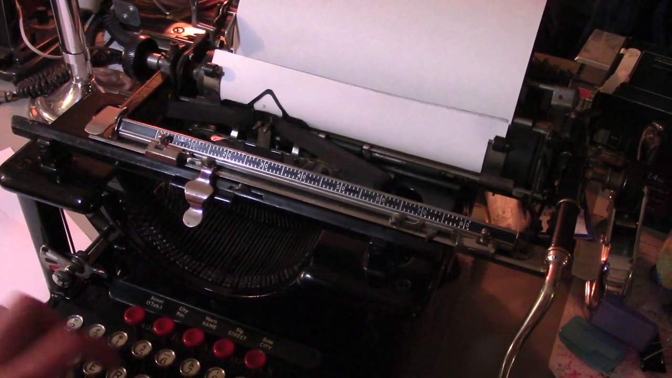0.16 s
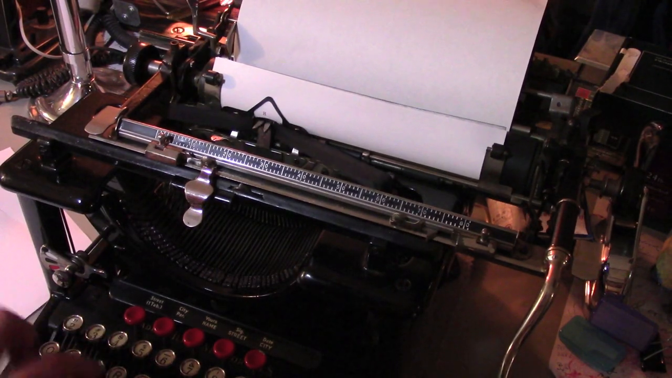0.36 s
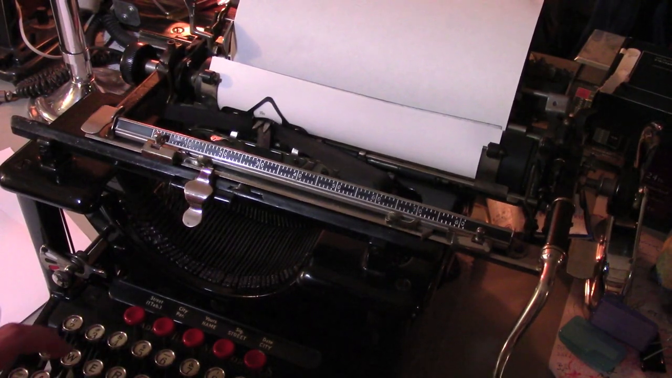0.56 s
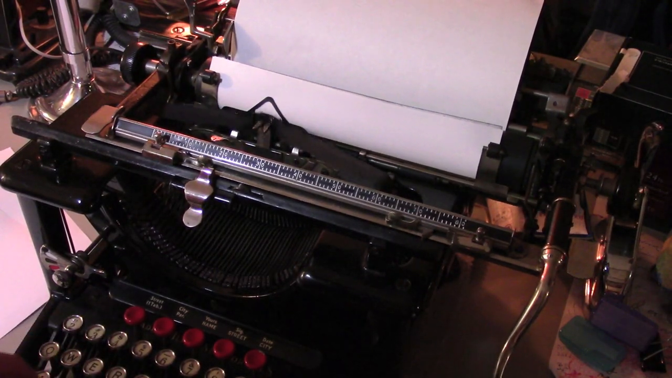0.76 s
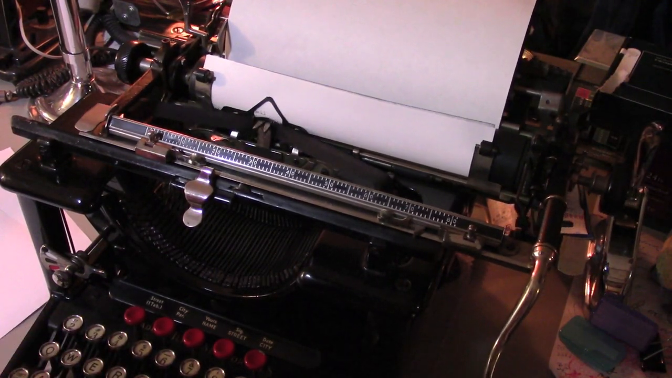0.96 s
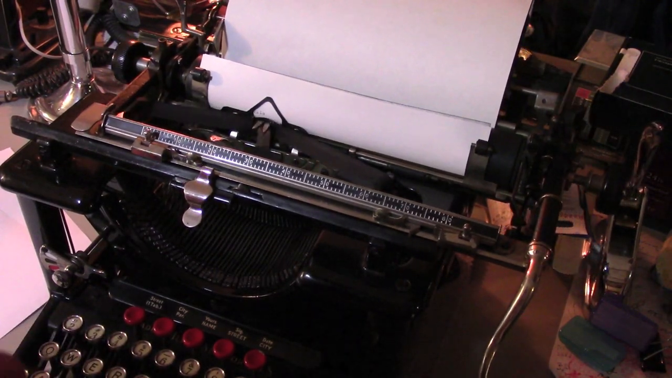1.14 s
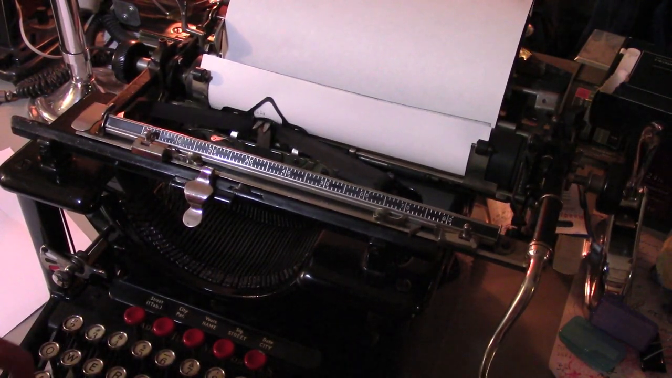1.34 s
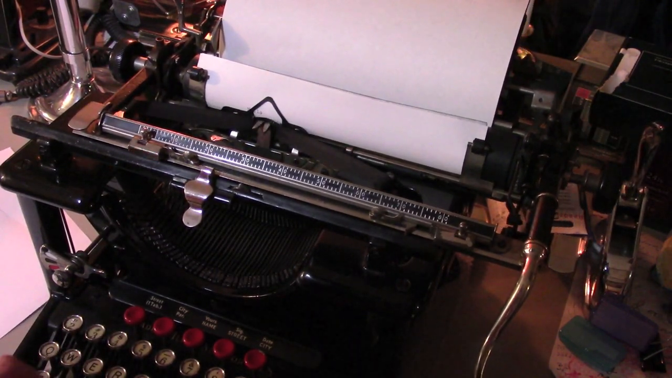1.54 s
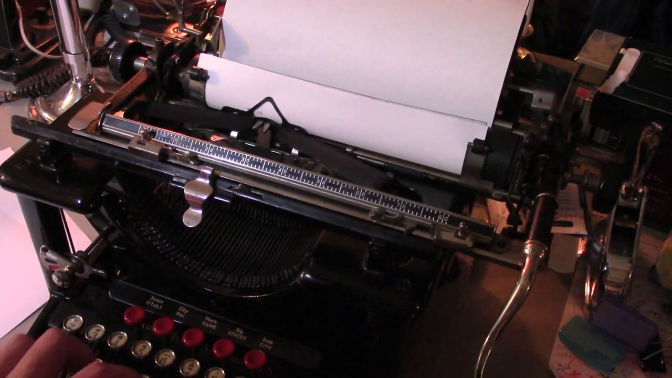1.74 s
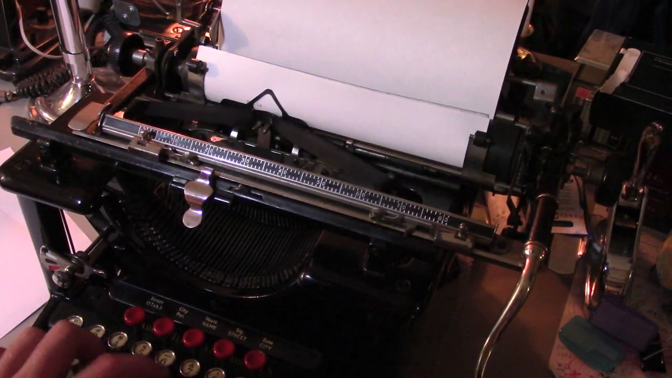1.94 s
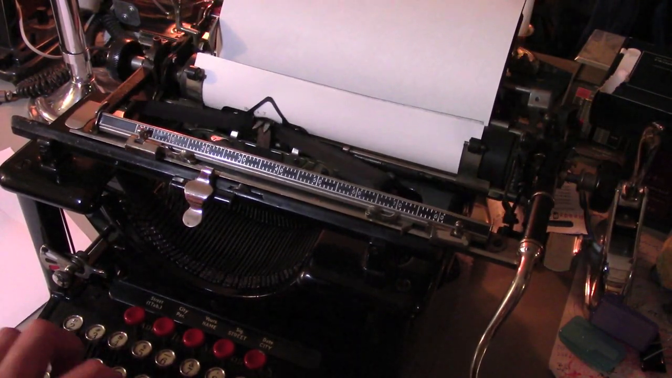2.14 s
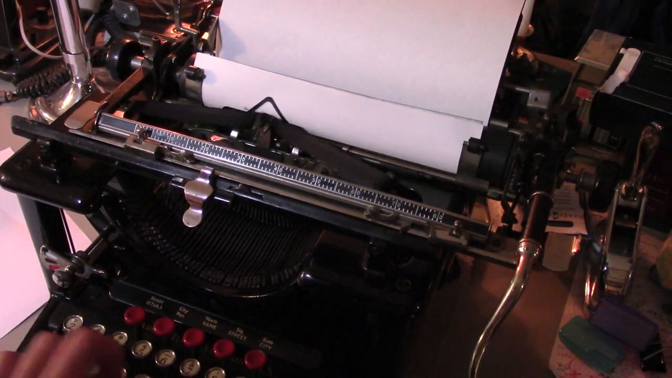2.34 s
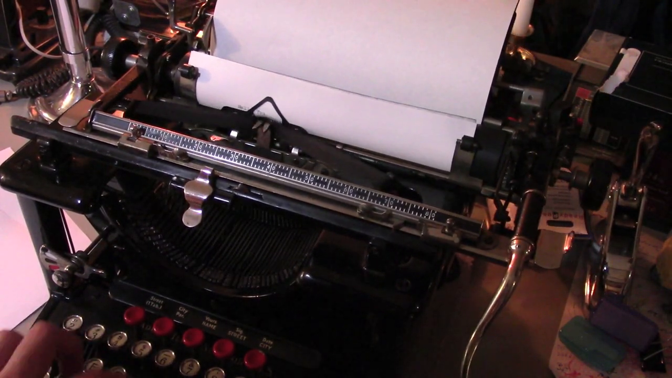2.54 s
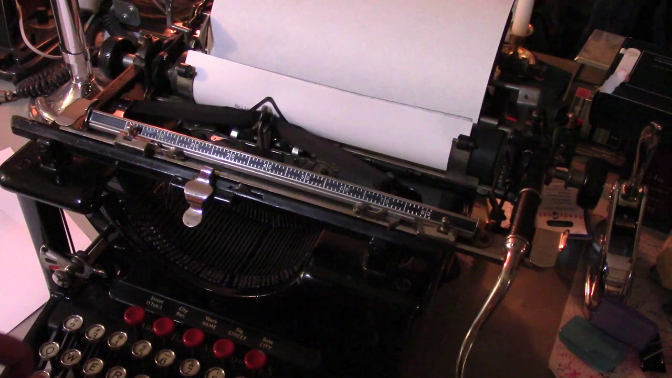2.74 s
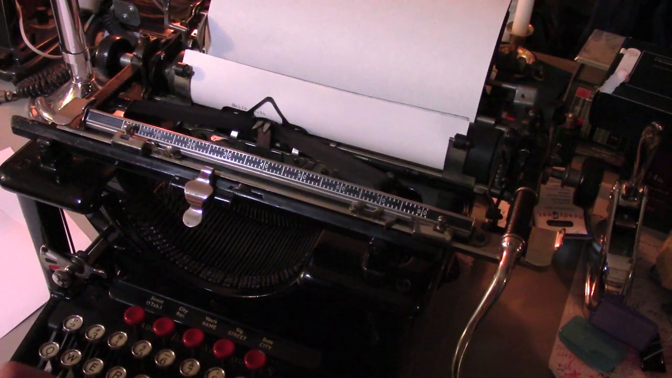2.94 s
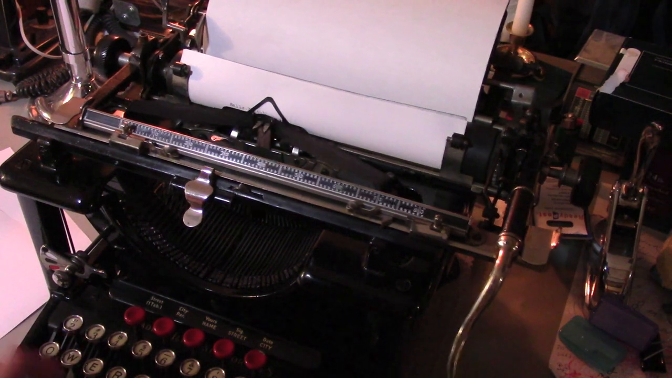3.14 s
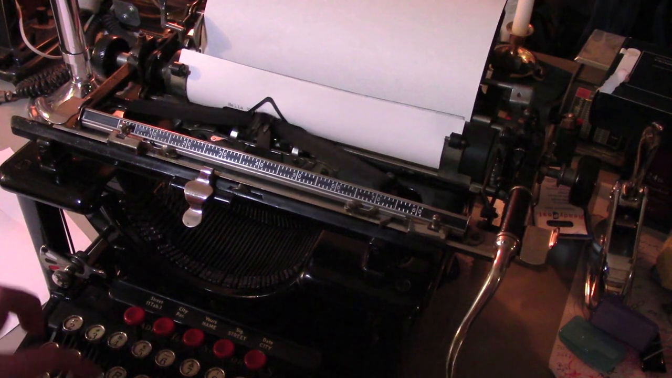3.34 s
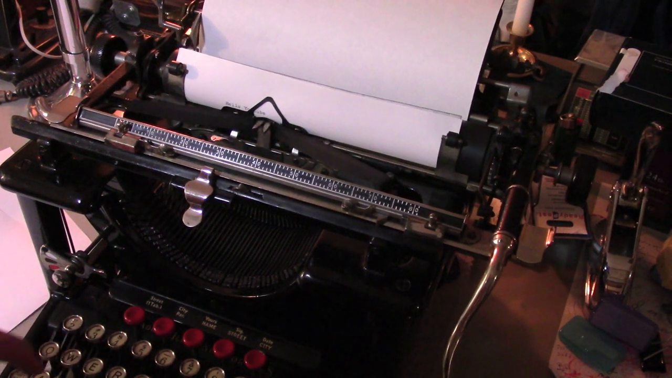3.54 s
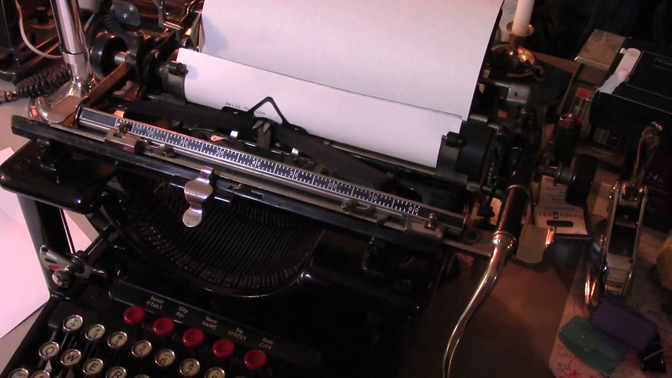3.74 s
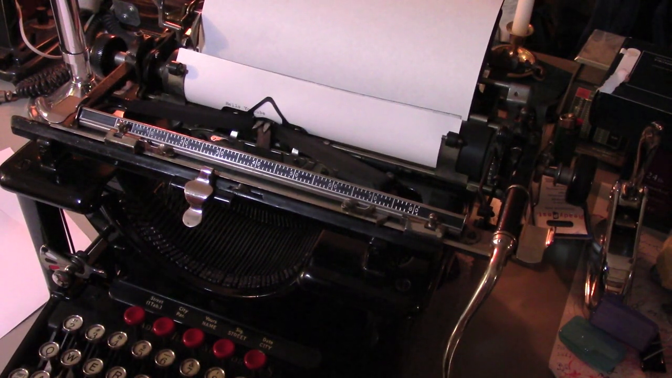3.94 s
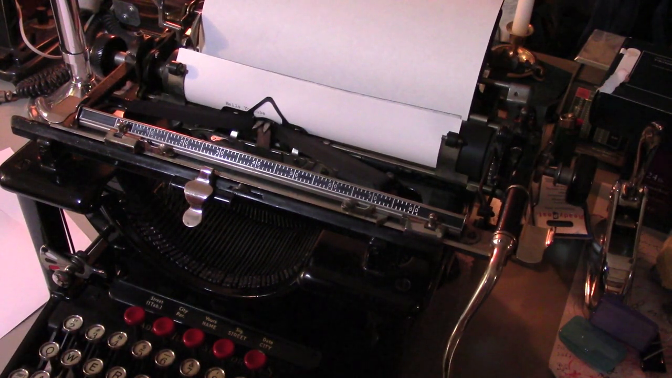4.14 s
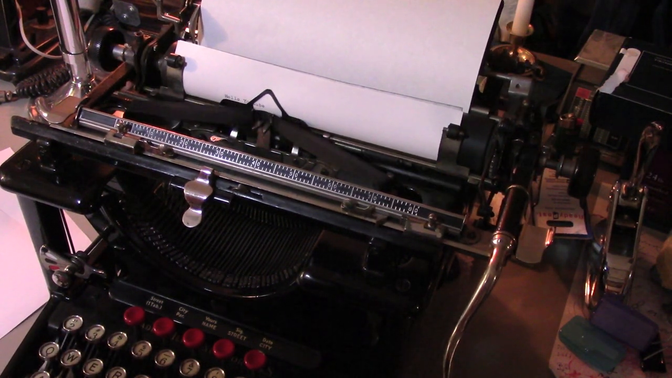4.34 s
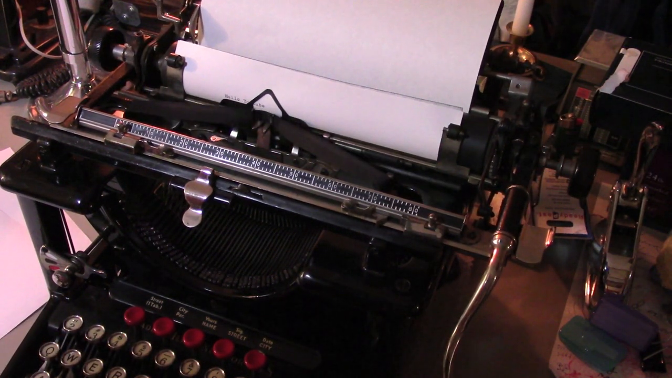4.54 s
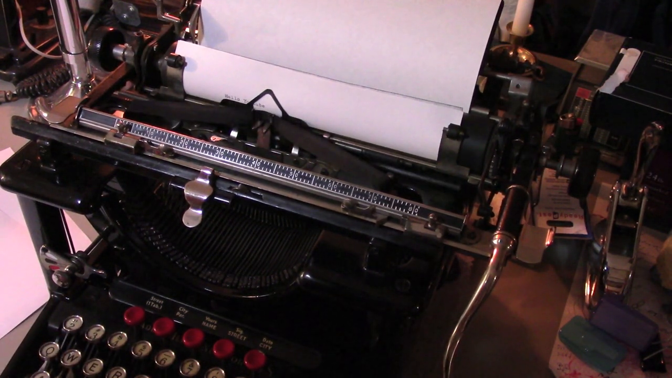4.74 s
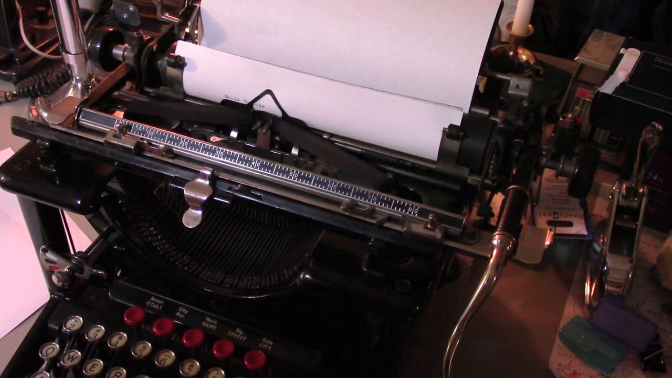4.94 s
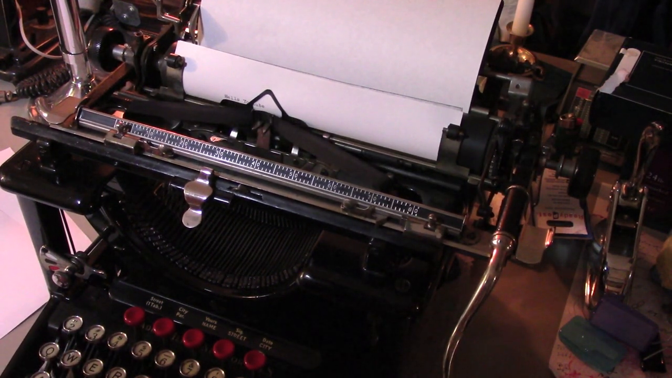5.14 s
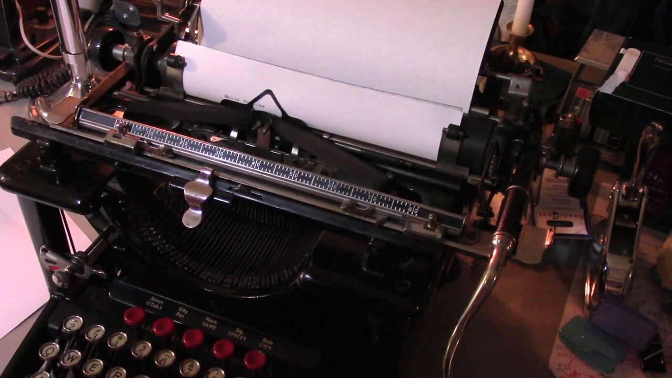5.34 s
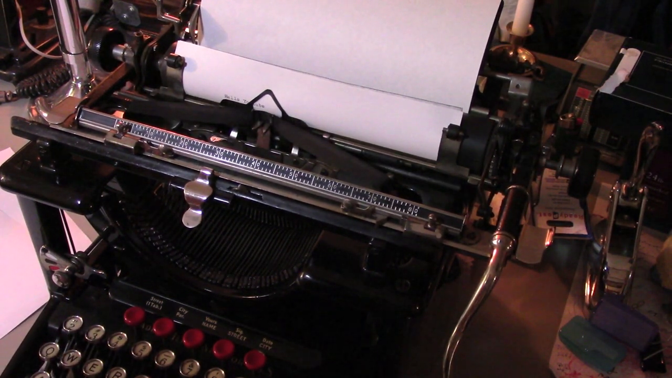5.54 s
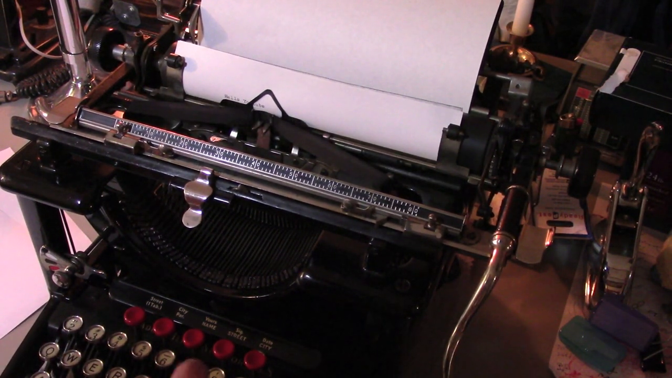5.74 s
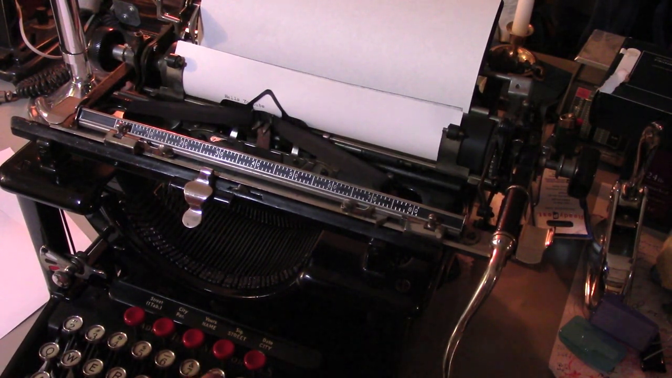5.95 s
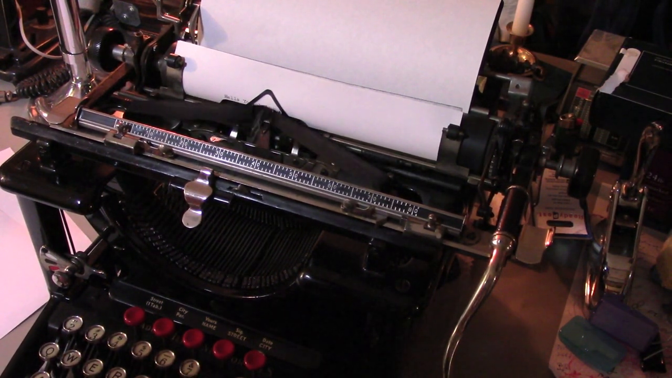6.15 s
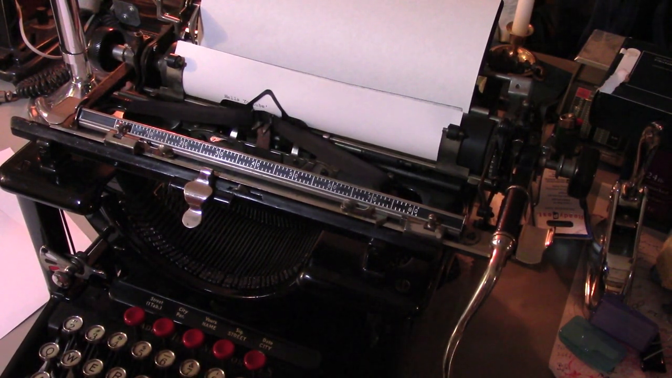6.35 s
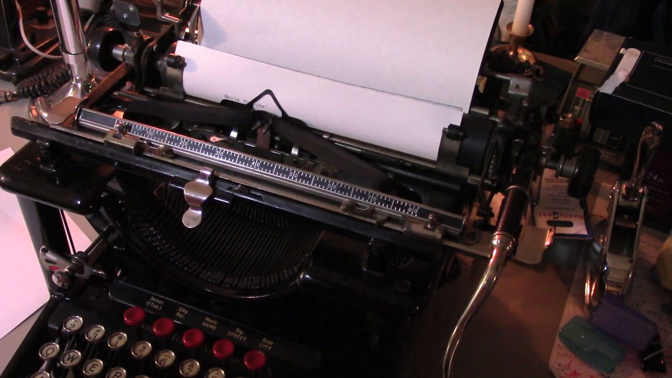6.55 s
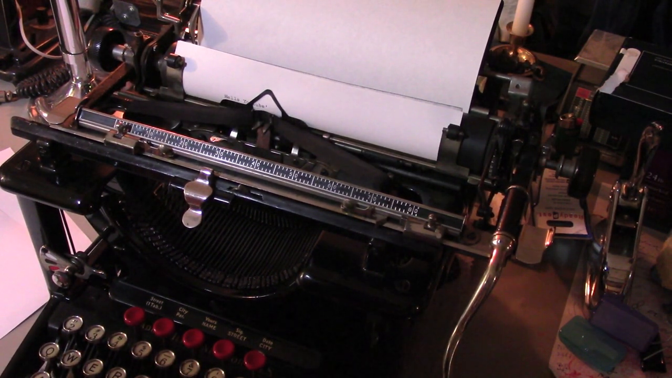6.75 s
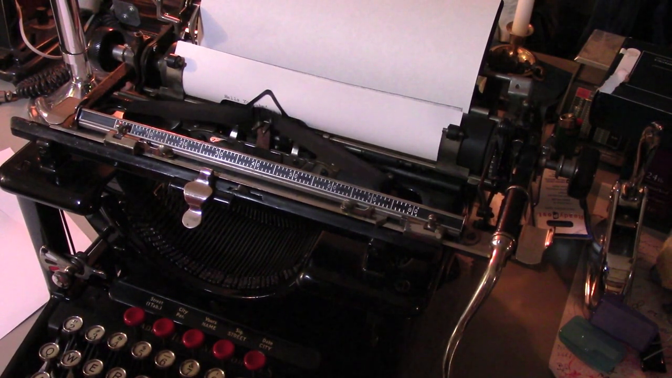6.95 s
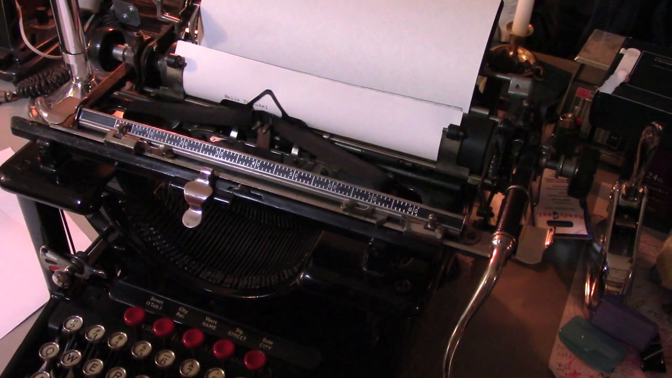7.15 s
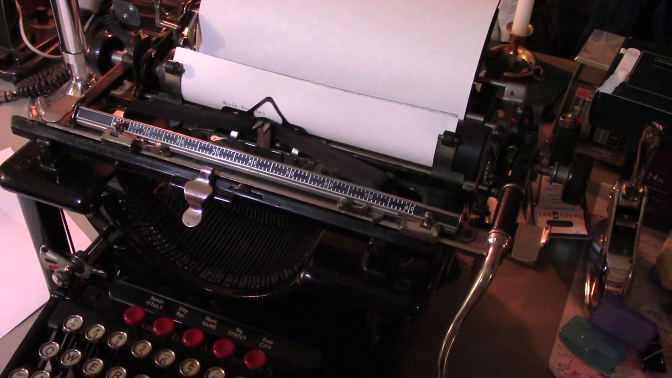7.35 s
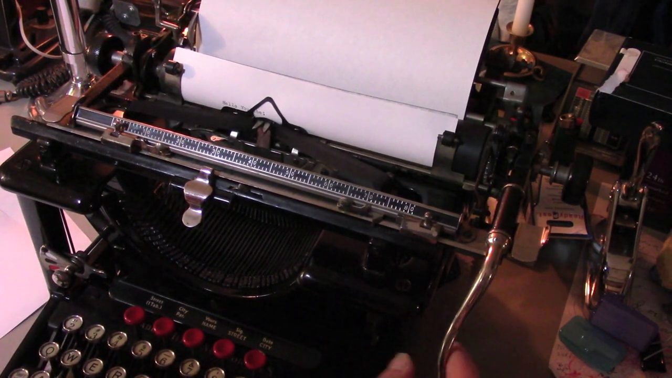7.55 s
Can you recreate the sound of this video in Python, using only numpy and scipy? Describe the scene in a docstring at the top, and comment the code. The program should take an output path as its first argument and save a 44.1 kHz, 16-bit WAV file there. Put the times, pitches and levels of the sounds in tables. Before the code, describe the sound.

A heavy old manual typewriter is heard very close, in mono, in a quiet room with faint low rumble and soft hiss. Typing starts at once: sharp metallic slaps at 0.05, 0.4, 0.8, 0.9 and 1.05 seconds, each preceded by a small linkage click and followed by a rattling key return and loose clinks. Duller space bar or carriage thumps fall at 0.25, 1.35, 1.9 and 2.15. A faster run of strikes goes from 2.0 to 2.75, then two more at 3.1 and 3.3. The machine then rests. A solid thump comes at 4.25 with a short steel ring, a weak clunk at 4.85, then only tiny ticks. A barely perceptible thin squeak hovers around 6 to 6.5. Single strikes land at 6.1 and 7.0, each falling back with a clatter, and a final weighty thump at 7.25 dies into quiet.

```python
"""Manual typewriter on a desk

An old manual typewriter is heard close by in a quiet room: linkage, escapement, type slap, then rattling returns.
Contacts are shaped noise bands with fast decay over a longer ring; thin steel and carriage are decaying sines.
Space bar and carriage thumps are heavier. Modal resonance carries contact noise into the frame and desk.
Beating springs, loose clinks, soft knocks and a faint gliding squeak sound over filtered room noise.
"""
import sys
import numpy as np
from scipy import signal
from scipy.fft import rfft, irfft, next_fast_len
from scipy.io import wavfile
from scipy.ndimage import uniform_filter1d

SR = 44100
rng = np.random.default_rng(int(sys.argv[2]) if len(sys.argv) > 2 else 0)


def to_wav(s):
    """Save 16-bit WAV."""
    ch = np.atleast_2d(s).T  # columns
    pcm = np.round(np.clip(ch, -1, 1) * 32767)  # PCM
    wavfile.write(sys.argv[1], SR, pcm.astype(np.int16))


N = 334719

# All event levels are relative: layer gains and resonances act on them later.
# Room noise density: frequency_hz, density_db (relative, per Hz)
ROOM_SPECTRUM = [(15, -19), (26, 1.5), (45, -7), (65, -11.5), (95, -12.5), (122, -12.5), (160, -15.5),
                 (260, -12), (420, -15.5), (520, -20), (720, -25.5), (1200, -27.5), (1750, -35.5),
                 (5000, -43), (15500, -48.5)]
# Decay of a blow in machine and room: frequency_hz, t60_s
HOLD_TIMES = [(60, 0.86), (130, 0.27), (350, .25), (900, 0.18), (2400, 0.17), (6000, 0.16), (14000, 0.18)]
# Letters, timed by the type hitting the platen: start_s, level_db, body_db, brightness_db,
# key_travel_s, key_db, escapement_db, key_held_s, fall_back_db
LETTERS = [(0.049, -17, 1, 5, .042, -34.5, -24, 0.075, -25.5),
           (0.4205, -16.5, 1, 0, 0.04, -30, -28, 0.07, -27.5),
           (0.784, -19, 6, -1, 0.045, -35.5, -25, 0.038, -30.5),
           (0.889, -17, 3.5, -0.5, 0.052, -33, -28, 0.045, -27),
           (1.0489, -16, 0.5, 1, .041, -38.5, -23, 0.067, -26.5),
           (2.0355, -16, -0.5, 2, .0395, -31, -23, 0.083, -30),
           (2.319, -18, 4.5, -1, 0.045, -33.5, -25, 0.069, -27),
           (2.4175, -17.5, 2.5, -2.5, 0.04, -30, -25, 0.049, -27.5),
           (2.5832, -16.5, 0, -3, 0.04, -31, -26.5, 0.07, -25.5),
           (2.7465, -16, 0.5, -2, .039, -32.5, -27, 0.062, -27),
           (3.098, -16, -0.5, -2, 0.039, -31.5, -24.5, 0.068, -25.5),
           (3.3144, -15, -4, -2.5, 0.036, -29.5, -26, 0.07, -26.5),
           (6.1179, -18, -1, 1, .0545, -39, -27, 0.071, -26.5),
           (6.9757, -16.5, -1, -1, 0.042, -40.5, -24, 0.076, -30)]
# Contact spectra, in order of first use: frequency_hz, density_db (relative, per Hz)
KEY_COLOUR = [(40, 0), (110, 9.5), (200, -0.5), (400, -2), (650, 4.5), (850, -2), (1200, -0.5),
              (1550, -10.5), (2200, 0), (3000, 4), (3900, -1), (4800, -1), (7000, -9.5), (15000, -19)]
ESCAPEMENT_COLOUR = [(40, -15.5), (200, -9.5), (450, -3), (800, 1.5), (1200, -8.5), (1600, -10.5),
                     (2200, 2), (3100, 2.5), (4100, -9.5), (6500, -8), (10000, -11), (15000, -16.5)]
STRIKE_COLOUR = [(40, -19), (110, -7), (200, -13.5), (310, -13), (430, 2), (620, -10), (1100, -3.5),
                 (1650, -6.5), (2600, -1.5), (3700, -1), (6500, -5), (9500, -10.5), (15000, -22)]
SNAP_COLOUR = [(100, -34), (1200, -19), (2200, -5), (3600, 4.5), (5200, -2), (7500, -13.5), (15000, -30)]
RETURN_COLOUR = [(40, 2.5), (130, 9), (260, -3), (480, 7.5), (700, -1.5), (1150, 4), (1550, -4.5),
                 (2900, -2), (4800, -4.5), (7000, -11.5), (11000, -17), (15000, -22)]
TICK_COLOUR = [(100, -3.5), (1000, 1.5), (3000, 1.5), (4200, 0.5), (6000, -2), (9000, -7.5), (15000, -14)]
THUMP_COLOUR = [(40, -2), (105, 7), (190, 5.5), (350, 3), (520, 6), (720, 2.5), (1150, -0.5), (1650, -7.5),
                (2500, -3.5), (4800, -8), (7000, -9), (10000, -16), (15000, -27)]
SOFT_COLOUR = [(50, 5.5), (150, 4.5), (300, 8.5), (850, -1), (1500, -19), (2400, -18), (5000, -35),
               (15000, -54)]
# Modes of frame, typebars and desk: frequency_hz, lift_db, t60_s
FRAME_MODES = [(72, 1, .7), (96, 0, .7), (121, 0, .5), (228, -5, .25), (425, -4, .2), (494, 0, .2),
               (946, -7, .12), (1132, -7, .08), (1311, -4, .13), (2092, -3, .08), (2240, -5, .09),
               (2837, 1, .09), (3060, -5, .06), (3290, -5, .06), (3832, -3, .06), (5190, -1, .07),
               (5598, -3, .09), (5917, -1, .13), (6892, -5, .08), (7854, -4, .08)]
# Small steel parts left singing: start_s, pitch_hz, level_db, t60_s
PINGS = [(.972, 7320, -25, 0.043), (1.159, 12100, -39, 0.23), (4.266, 2140, -31, 0.15),
         (4.867, 5700, -34, .05), (4.863, 4000, -33.5, .064), (6.241, 9380, -25, 0.074),
         (4.4, 5570, -51, 0.062), (6.241, 5030, -35, 0.1)]
# Contacts of a fall-back: delay (multiple of key_held_s), level_db, body_db, brightness_db
KEY_RELEASE = (1, -5, 0, -6)
CARRIAGE_STEP = (1.27, -4.5, 1, -4)
BAR_LANDING = (1.61, -.5, .5, 3)
# Additions for a lone letter, which has no separate carriage step: level_db, body_db, brightness_db
LONE_RELEASE = (-1.9, -6.5, 2)
LONE_LANDING = (.5, -2.5, 2.1)
# Space bar springing back: pressed_s, held_s, level_db
SPACE_RETURNS = [(1.358, 0.061, -28.5)]
# Linkage slack taken up just ahead of a slow thump: start_s, level_db, body_db, brightness_db
TAKE_UPS = [(4.839, -29.5, -3.5, 1), (7.252, -37.5, 10.5, 0)]
# Further light ticks, among them a typebar's bounce: start_s, level_db
TICKS = [(.601, -46.5), (1.342, -47), (2.249, -39.5), (2.95, -51), (4.403, -60.5), (4.81, -57),
         (5.287, -56), (5.43, -61), (5.564, -51), (7.241, -44), (7.36, -50.5)]
# Space bar and carriage thumps: start_s, level_db, desk_db, frame_db, knock_db, brightness_db,
# squarely_hit_mode_hz, squarely_hit_lift_db, tooth_db
THUMPS = [(.234, -19.5, -1, -6.5, -3.5, -1, 1340, 7.5, -40), (1.3556, -26, -4, 3.5, -3.5, 1, 321, 19, -17),
          (1.921, -20, -2, -3, -3.5, -4.5, 1160, 10.5, -20.5),
          (2.1471, -19.5, -0.5, -10, -9, -4, 1085, 12.5, -23.5),
          (2.163, -28.5, -5, 0, 4, 3.5, 480, 8.5, -27), (4.2663, -23, -2, -2, -1.5, -4.5, 1107, 11, -20.5),
          (4.8452, -34, -2.5, 3.5, -1.5, 7, 363, 15.5, -25.5),
          (7.264, -19.5, -1, -2, -1, -2.5, 2850, 9, -20.5)]
# Carriage on its rails, knocked as a whole: frequency_hz, level_db, t60_s
CARRIAGE_MODES = [(88, -8, .13), (128, -5, .11), (225, -11, .11), (292, -10, .1), (362, -13, .1),
                  (492, -2.5, .13), (530, -8, .09), (955, -9, .07), (1085, -5, .045), (1165, -5, .05),
                  (1314, -8, .11), (2850, -9, .05), (4830, -8, .06)]
# Soft knocks of the desk: start_s, level_db
SOFT_KNOCKS = [(1.49, -41), (4.223, -44.5), (4.246, -59), (7.425, -45)]
# Broken high squeak: time_s, pitch_hz, level_db
SQUEAK_PATH = [(5.8, 9500, -90), (5.92, 12000, -79), (6.1, 14000, -83), (6.32, 12100, -75),
               (6.38, 10700, -76), (6.43, 10320, -77), (6.5, 8800, -90)]

BANDS_HZ = 40 * 2 ** (np.arange(27) / 3)  # third-octave centres
LENGTH = int(.32 * SR)  # samples in one blow
ATTACK = int(.012 * SR)  # samples that set the scale of a blow's energy
ROOM_DB, TOP_HZ = -50, 16000
KEY_BODY_DB, KEY_BRIGHT_DB = 0, 3
TRIP_SHARE, TRIP_DB = .2, 2.5  # share of key travel left at the trip; layer gain
RUN_GAP_S = .5  # closer letters belong to a quick run
SPRING_HZ, SPRING_BEAT_HZ, SPRING_DB, SPRING_T60_S = 8400, 9, -64, 1.2
CLINK_COUNT, CLINK_SCATTER_DB, CLINK_FADE_DB = 3, 5, -9  # latest clinks get the full fade
GLIDE_LAG_S, GLIDE_DB = .088, -36.5
BOUNCE_S, BOUNCE_DB = .051, -20.5
TOOTH_LAG_S = .0032


def undb(db):
    """Logarithmic level: convert decibels to amplitude gain."""
    return 10 ** (np.asarray(db) / 20)


def at_hz(points, hz):
    """Logarithmic pitch: interpolate a frequency table along a log axis."""
    f, value = np.transpose(points)
    return np.interp(np.log(np.maximum(hz, 1)), np.log(f), value)


def add(track, s, sound):
    """Superposition: mix a sound into the track at time s."""
    i = max(int(s * SR), 0)
    track[i:i + len(sound)] += sound[:N - i]


def band_noise(size):
    """Band-pass filtering: unit-level noise in each third-octave band."""
    hz = np.maximum(np.fft.rfftfreq(size, 1 / SR), 1)
    octaves = np.log2(hz / BANDS_HZ[:, None])
    shape = np.cos(np.pi / 2 * np.clip(3 * octaves, -1, 1))
    spectrum = rfft(rng.standard_normal((len(BANDS_HZ), size)))
    bands = irfft(shape * spectrum, size)
    return (bands / bands.std(axis=1, keepdims=True)).astype(np.float32)


def chatter(size, spread_db, count):
    """Random amplitude modulation: contact strength changes every count samples, then is smoothed."""
    held = np.repeat(rng.standard_normal(size // count + 1), count)[:size]
    return uniform_filter1d(undb(spread_db * held), size=count // 4)


def blows(rows, zones_hz, colour, rise_s, crack_s, tail_db, alike):
    """Impact radiation: a fast crack over a longer ring; rows hold start_s, level_db and zone lifts."""
    t = np.arange(LENGTH, dtype=np.float32) / SR
    hz = BANDS_HZ[:, None].astype(np.float32)
    rise = 1 - np.exp(-t / (rise_s + 1.8 / hz))  # low bands start later
    crack = np.exp(-t / (crack_s + 1.2 / hz))
    ring = undb(tail_db) * np.exp(-np.log(1000) * t / at_hz(HOLD_TIMES, hz))
    fade_out = np.minimum(1, 10 * (1 - t / t[-1]))
    envelope = (rise * (crack + ring) * fade_out).astype(np.float32)
    weight = undb(at_hz(colour, BANDS_HZ)) * np.sqrt(BANDS_HZ)  # density times bandwidth
    weight /= np.linalg.norm(weight)

    shared, varied = band_noise(LENGTH), band_noise(size=65536)
    alike = float(np.clip(alike, 0, 1))  # share of energy common to these blows
    out = np.zeros(N)
    for s, db, *lifts in rows:
        start = rng.integers(varied.shape[1] - LENGTH)
        excerpt = varied[:, start:start + LENGTH]
        bands = envelope * (alike ** .5 * shared + (1 - alike) ** .5 * excerpt)
        bands *= chatter(LENGTH, 2.2, count=70).astype(np.float32)  # loose joints
        colour_scatter_db = 1.6 * rng.standard_normal(len(BANDS_HZ))
        lift_db = np.interp(np.log(BANDS_HZ), np.log(zones_hz), lifts)
        gain = weight * undb(db + colour_scatter_db + lift_db)
        gain /= np.sqrt(np.einsum("ij,ij->i", bands, bands) / ATTACK)
        add(out, s, gain.astype(np.float32) @ bands)
    return out


def contacts(rows, colour, rise_s, crack_s, tail_db, alike):
    """Spectral balance: blows vary in body and brightness about a steady upper middle."""
    rows = [(s, db, body, 0, 0, bright) for s, db, body, bright in rows]
    return blows(rows, [600, 1800, 5000, 9000], colour, rise_s, crack_s, tail_db, alike)


def plain_contacts(rows, colour, **settings):
    """Uniform contact colour: impacts with no added body or brightness."""
    return contacts([(s, db, 0, 0) for s, db in rows], colour, **settings)


def strike_modes(modes):
    """Modal excitation: one blow starts decaying sines of given pitch, level and T60."""
    hz, db, t60 = np.transpose(modes)[:, :, None].astype(np.float32)
    t = np.arange(LENGTH, dtype=np.float32) / SR
    decay = np.exp(-np.float32(np.log(1000)) * t / t60)
    return np.sum(undb(db) * decay * np.sin(2 * np.pi * hz * t), axis=0)


def thin_steel(rows, colour, ring_db, t60, count):
    """Free vibration of bars: each contact rings briefly at a few pitches drawn for it."""
    out = np.zeros(N)
    for (s, db, *_), draw in zip(rows, rng.random((len(rows), 2, count))):
        hz = 2000 * 7 ** ((np.arange(count) + draw[0]) / count)
        level_db = db + ring_db + at_hz(colour, hz) + 10 * np.log10(hz / hz[0])
        decay_s = t60 * (.5 + draw[1])
        add(out, s, strike_modes(np.c_[hz, level_db, decay_s]))
    return out


def clinks(rows, colour, spread_s, clink_db, t60):
    """Secondary impacts: loose joints clink at random after a contact, with later hits tending weaker."""
    hits = []
    for s, db, *_ in rows:
        for late, luck in rng.random((CLINK_COUNT, 2)):
            level_db = db + CLINK_FADE_DB * late + CLINK_SCATTER_DB * (2 * luck - 1)
            hits.append((s + spread_s * late, level_db))
    return thin_steel(hits, colour, ring_db=clink_db, t60=t60, count=6)


def in_run():
    """Temporal proximity: flag letters whose nearest neighbour falls within the run gap."""
    times = np.array(LETTERS)[:, 0]
    return np.sort(abs(times - times[:, None]))[:, 1] < RUN_GAP_S


def run_times():
    """Rhythmic grouping: strike times of letters in quick runs."""
    return np.array(LETTERS)[in_run(), 0]


def room():
    """Stationary noise: steady low rumble under a faint hiss, made by spectral filtering."""
    size = next_fast_len(N)
    hz = np.fft.rfftfreq(size, 1 / SR)
    spectrum = rfft(rng.standard_normal(size)) * undb(at_hz(ROOM_SPECTRUM, hz))
    air = irfft(spectrum, size)[:N]
    return undb(ROOM_DB) * air / air.std()


def key_presses():
    """Mechanical delay: each key takes up its linkage one travel time before type impact."""
    return [(s - travel_s, key_db, KEY_BODY_DB, KEY_BRIGHT_DB)
            for s, _, _, _, travel_s, key_db, *_ in LETTERS]


def linkage():
    """Impact at a clearance: key levers take up their slack with a click."""
    return undb(2.5) * contacts(key_presses(), KEY_COLOUR, rise_s=.0015, crack_s=.007,
                                tail_db=-15, alike=.35)


def escapement():
    """Sudden release: the escapement trips when a set share of key travel remains."""
    trips = [(s - TRIP_SHARE * travel_s, trip_db)
             for s, _, _, _, travel_s, _, trip_db, *_ in LETTERS]
    return undb(TRIP_DB) * plain_contacts(trips, ESCAPEMENT_COLOUR, rise_s=.0003, crack_s=.009,
                                          tail_db=-8, alike=.3)


def typebars():
    """Impulsive collision: the flying bar slaps ribbon, paper and platen."""
    rows = [row[:4] for row in LETTERS]
    return undb(-1.18) * contacts(rows, STRIKE_COLOUR, rise_s=.0001, crack_s=.0033,
                                  tail_db=-11.5, alike=.35)


def type_snaps():
    """Hard-contact transient: type meets the platen with a very brief, bright snap."""
    rows = [row[:2] for row in LETTERS]
    return undb(-3.5) * plain_contacts(rows, SNAP_COLOUR, rise_s=.00005, crack_s=.00055,
                                       tail_db=-36, alike=.3)


def frame(x):
    """Modal resonance: convolve contact noise with the decaying modes of frame, typebars and desk."""
    t = np.arange(SR) / SR
    response = np.zeros(SR)
    response[0] = 1  # direct sound
    for hz, db, t60 in FRAME_MODES:
        rate = np.log(1000) / t60
        mode = np.exp(-rate * t) * np.cos(2 * np.pi * hz * t)
        response += undb(db) * 2 * rate / SR * mode
    return signal.fftconvolve(x, response)[:N]


def pings():
    """Free decay and beating: small steel rings, and two close spring pitches follow run letters."""
    out, t = np.zeros(N), np.arange(SR) / SR
    spring = [(s, hz, SPRING_DB, SPRING_T60_S) for s in run_times()
              for hz in (SPRING_HZ, SPRING_HZ + SPRING_BEAT_HZ)]
    for s, hz, db, t60 in PINGS + spring:
        add(out, s, undb(db - 60 * t / t60) * np.sin(2 * np.pi * hz * t))
    return out


def fall_back(s, held_s, db, lone=False):
    """Sequential impacts: key release, carriage step and bar landing; a lone letter omits the step."""
    chain = [KEY_RELEASE, CARRIAGE_STEP, BAR_LANDING]
    if lone:
        chain = [np.add(KEY_RELEASE, (0, *LONE_RELEASE)), np.add(BAR_LANDING, (0, *LONE_LANDING))]
    return [(s + holds * held_s, db + level, body, bright) for holds, level, body, bright in chain]


def fall_backs():
    """Elastic return: collect the contacts of letters and space bar on their way back."""
    letters = [(s, held_s, db, not quick)
               for (s, *_, held_s, db), quick in zip(LETTERS, in_run())]
    return [contact for stroke in letters + SPACE_RETURNS for contact in fall_back(*stroke)]


def returns():
    """Damped impact: returning parts meet their rests, and linkage takes up before slow thumps."""
    return undb(1) * contacts(fall_backs() + TAKE_UPS, RETURN_COLOUR, rise_s=.0039, crack_s=.007,
                              tail_db=-14, alike=.18)


def glide():
    """Sustained contact noise: carriage and swinging typebars rattle softly after run letters."""
    rows = [(s + GLIDE_LAG_S, GLIDE_DB) for s in run_times()]
    rattle = plain_contacts(rows, RETURN_COLOUR, rise_s=.025, crack_s=.016, tail_db=-24, alike=.092)
    return rattle * chatter(N, spread_db=5.5, count=300)


def ticks():
    """Light secondary impact: each landed typebar bounces once, and loose parts tick."""
    bounces = [(s + BAR_LANDING[0] * held_s + BOUNCE_S, db + BOUNCE_DB)
               for s, *_, held_s, db in LETTERS]
    return undb(-1.5) * plain_contacts(TICKS + bounces, TICK_COLOUR, rise_s=.0002, crack_s=.003,
                                       tail_db=-10.5, alike=.2)


def thumps():
    """Heavy impact: space bar bottoming and carriage jolts give duller, weightier contact noise."""
    rows = [(s, db, desk, body, knock, 0, 0, bright)
            for s, db, desk, body, knock, bright, *_ in THUMPS]
    return undb(3.5) * blows(rows, [170, 450, 1100, 1900, 5000, 9000], THUMP_COLOUR,
                             rise_s=.0015, crack_s=.009, tail_db=-4.5, alike=.08)


def carriage():
    """Position-dependent excitation: where a thump lands decides which carriage modes speak most."""
    out = np.zeros(N)
    hz, mode_db, t60 = np.transpose(CARRIAGE_MODES)
    square_width = .086  # in natural-log frequency
    scatters = rng.standard_normal((len(THUMPS), len(hz)))
    for (s, db, desk, body, knock, _, square_hz, square_db, _), scatter in zip(THUMPS, scatters):
        lift = np.interp(np.log(hz), np.log([170, 450, 1100, 1900]), [desk, body, knock, 0])
        lift += square_db * np.exp(-(np.log(hz / square_hz) / square_width) ** 2)
        struck_hz = hz * (1 + .004 * scatter)
        add(out, s, strike_modes(np.c_[struck_hz, db + mode_db + lift, t60]))
    return undb(1.5) * out


def tooth_catches():
    """Hard-contact transient: the carriage catches its tooth just after a thump."""
    rows = [(s + TOOTH_LAG_S, tooth_db) for s, *_, tooth_db in THUMPS]
    return undb(-5.5) * plain_contacts(rows, SNAP_COLOUR, rise_s=.00005, crack_s=.0015,
                                       tail_db=-24, alike=.2)


def soft_knocks():
    """Damped low-frequency impact: the desk gives a soft knock now and then."""
    return plain_contacts(SOFT_KNOCKS, SOFT_COLOUR, rise_s=.0024, crack_s=.017, tail_db=0, alike=.14)


def squeak():
    """Frequency and amplitude modulation: one thin tone glides and flutters."""
    s, hz, db = np.transpose(SQUEAK_PATH)
    t = np.arange(N) / SR
    sounding = (t > s[0]) & (t < s[-1])
    gain = sounding * undb(np.interp(t, s, db)) * chatter(N, spread_db=3.5, count=600)
    phase = 2 * np.pi * np.cumsum(np.interp(t, s, hz)) / SR
    return gain * np.sin(phase)


def scene():
    """Superposition: sum the resonated contacts, direct sounds and room in one channel."""
    bars = thin_steel(LETTERS, STRIKE_COLOUR, ring_db=-9, t60=.053, count=9)
    lever_rows = key_presses() + fall_backs() + TAKE_UPS
    levers = thin_steel(lever_rows, RETURN_COLOUR, ring_db=-10.5, t60=.037, count=6)
    strike_clinks = clinks(LETTERS, STRIKE_COLOUR, spread_s=.016, clink_db=-5.5, t60=.013)
    return_clinks = clinks(fall_backs(), RETURN_COLOUR, spread_s=.022, clink_db=2.5, t60=.02)
    letter_noise = linkage() + escapement() + typebars() + returns() + glide() + ticks()
    machine = undb(-1) * frame(letter_noise + thumps() + soft_knocks())
    steel = bars + levers + strike_clinks + return_clinks + pings()
    direct = type_snaps() + carriage() + tooth_catches() + squeak()
    return (room() + machine + steel + direct)[None]


def record(dry):
    """Saturation and low-pass filtering: round the sharpest peaks and cut the top."""
    limit = .72  # full-scale amplitude
    rounded = limit * np.tanh(dry / limit)
    low_pass = signal.ellip(10, .2, 70, TOP_HZ, fs=SR, output="sos")
    return signal.sosfilt(low_pass, rounded)


dry = scene()
out = record(dry)
to_wav(out)
```